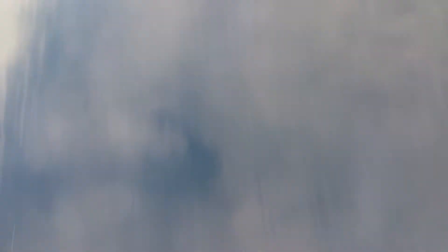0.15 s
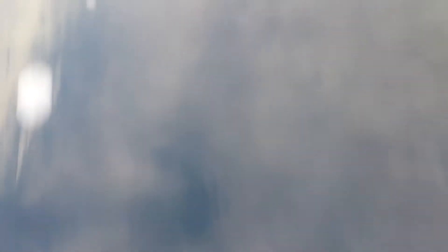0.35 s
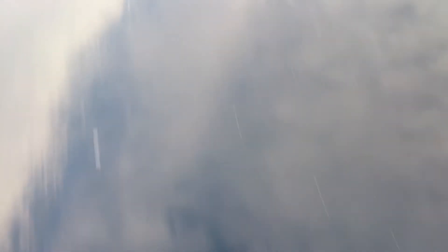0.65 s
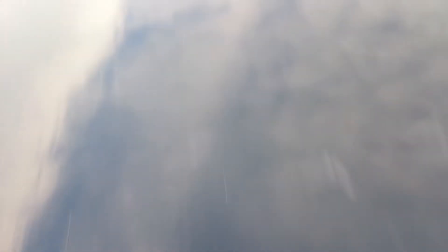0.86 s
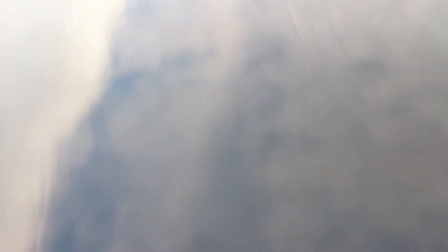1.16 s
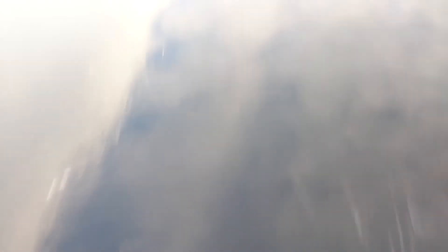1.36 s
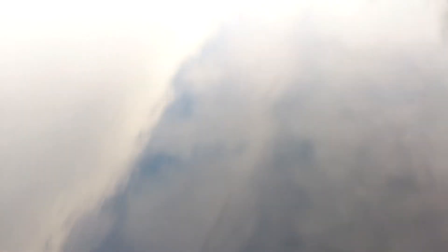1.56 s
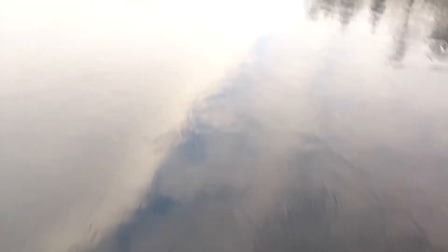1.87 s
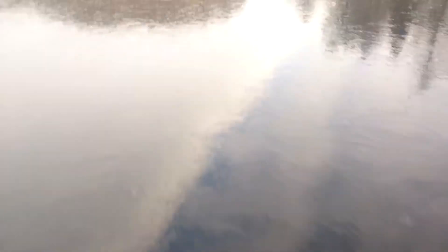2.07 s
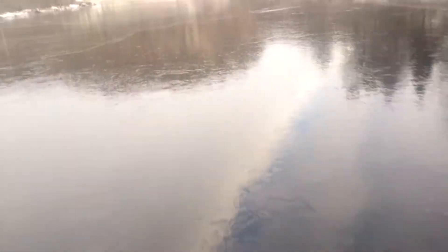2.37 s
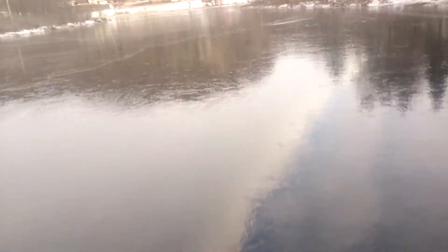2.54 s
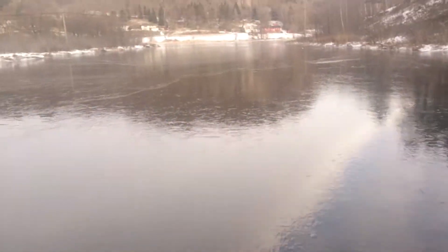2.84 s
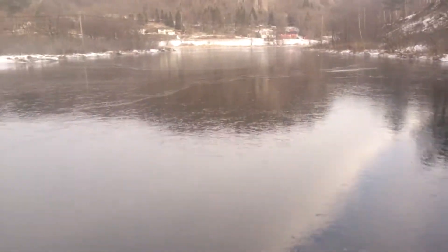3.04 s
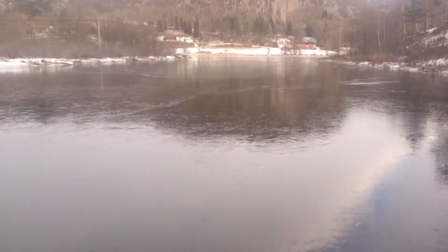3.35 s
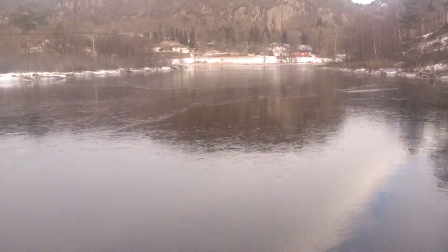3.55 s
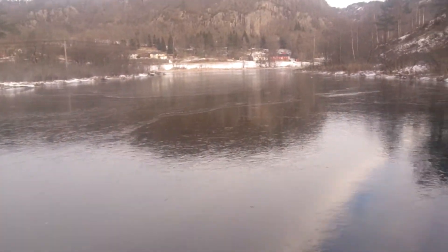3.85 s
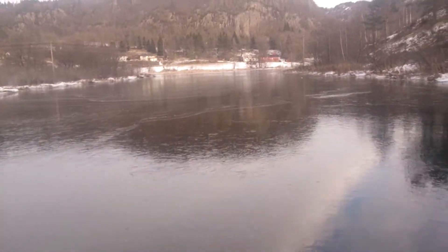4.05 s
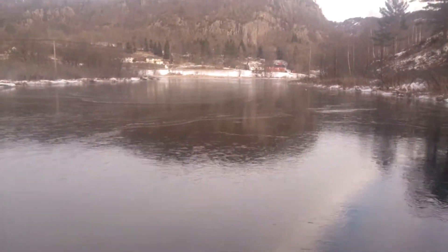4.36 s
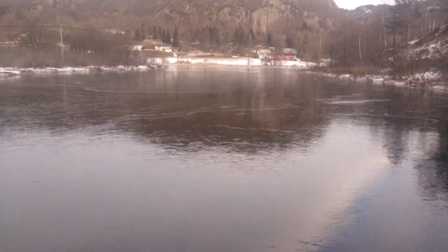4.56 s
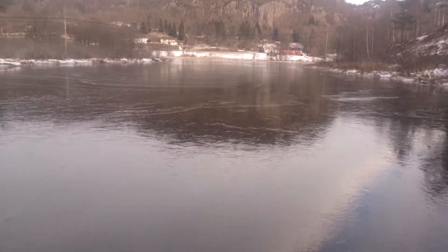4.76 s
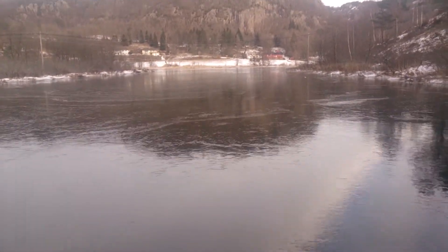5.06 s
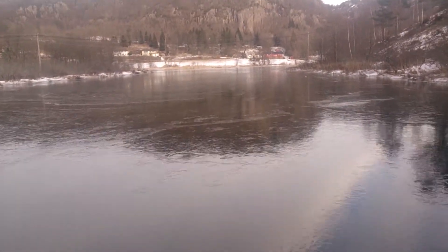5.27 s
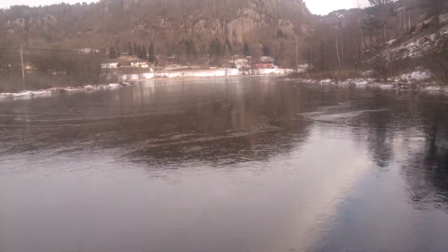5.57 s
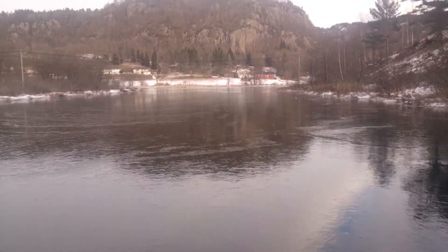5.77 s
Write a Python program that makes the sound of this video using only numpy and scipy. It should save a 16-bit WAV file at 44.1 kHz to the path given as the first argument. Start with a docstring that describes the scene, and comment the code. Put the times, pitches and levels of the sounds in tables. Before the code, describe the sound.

A skater's blades scrape river ice outdoors: short rough bites over a soft continuous hiss, with dry snaps, ticks and occasional bright skids of ice dust. The first second and a half is mostly ice detail; then gusts flutter and buffet the right side of the microphone while cracking continues to the end. A very faint low drone lies beneath. Direct stereo sound without reverberation.

```python
"""Skating on thin river ice

Blades crunch and hiss on the ice: noise grains coloured for a left and a right microphone port.
Cracks snap as short bursts of noise with a ring and a dull knock; brief skids add bright sprays.
Wind rumbles, flutters and thumps, far louder on the right, over a low drone with a faint hum.
The camera first looks down, then tilts ahead, and the colour of blades and cracks shifts with it.
"""
import sys
import numpy as np
from scipy import signal
from scipy.fft import rfft, irfft, next_fast_len
from scipy.io import wavfile
from scipy.ndimage import uniform_filter1d

SR = 44100
rng = np.random.default_rng(int(sys.argv[2]) if len(sys.argv) > 2 else 0)


def generate_wav(sig):
    """Save sig (samples, or channels by samples) to the path in sys.argv[1] as 16-bit PCM at SR."""
    pcm = np.round(np.clip(np.atleast_2d(sig).T, -1, 1) * 32767).astype(np.int16)
    wavfile.write(sys.argv[1], SR, pcm)


N = 260631

# How the wind's strength changes. Each row: time in seconds, rumble in dB before the wind's trims.
WIND_STRENGTH = [(0.0, -37), (0.55, -41), (0.8, -52), (1.17, -39.5), (1.33, -30.5), (1.47, -34.5),
                 (1.9, -30), (2.1, -23), (2.42, -25), (2.62, -29), (2.95, -21.5), (3.22, -29), (3.4, -19),
                 (3.62, -31), (4.1, -28.5), (4.75, -24.5), (5.0, -27), (5.91, -30.5)]
# Colour of the ice sounds at the right port.
# Each row: frequency in Hz, gain looking down in dB, gain looking ahead in dB.
RIGHT_COLOUR = [(94, -2, 4.5), (288, 1.5, -1.5), (900, -0.5, -3), (1120, -3, 2.5), (1690, 1, 5.5),
                (1965, 4.5, 13), (2335, -4, 0.5), (3234, -9, -1.5), (3930, -4, -19), (5220, -1, -6),
                (6620, -20.5, -22), (7790, -8.5, -12.5), (8900, -15, -13), (10730, -32, -32.5),
                (12700, -18, -34), (15400, -63, -40)]
# Colour of the ice sounds at the left port.
# Each row: frequency in Hz, gain looking down in dB, gain looking ahead in dB.
LEFT_COLOUR = [(97, -2.5, -11), (276, -0.5, -3), (1000, -6, -5.5), (1180, -12.5, -6), (1560, -18.5, -15),
               (2000, -10.5, -4.5), (2300, -13.5, -11), (3450, -12, -14.5), (5600, -19, -25.5),
               (6300, -25, -29), (9200, -18.5, -26), (11000, -29, -30.5), (13300, -24.5, -43),
               (15800, -41, -41)]
DOWN, AHEAD = 1, 2  # the gain columns of the two port tables


def amp(db):
    """Turns decibels into a plain factor."""
    return 10 ** (np.asarray(db) / 20)


def unit(x):
    """Scales to an rms of 1."""
    return x / np.sqrt(np.mean(x ** 2) + 1e-20)


def colour(table, hz, axis=1):
    """Gain at hz from one dB column of a spectrum table."""
    table = np.array(table, float)
    return amp(np.interp(np.log(hz + 1), np.log(table[:, 0] + 1), table[:, axis]))


def port_colours(hz, view):
    """Gains of the left and right port while the camera looks down or ahead."""
    return np.array([colour(port, hz, axis=view) for port in (LEFT_COLOUR, RIGHT_COLOUR)])


def curve(table):
    """Gain at every sample from the dB column of a time table."""
    table = np.array(table, float)
    return amp(np.interp(np.arange(N) / SR, table[:, 0], table[:, 1]))


def shaped(x, gain):
    """Filters x by a gain that is a function of frequency."""
    size = next_fast_len(N + 4096)
    return irfft(rfft(x, size) * gain(np.fft.rfftfreq(size, 1 / SR)), size)[..., :N]


def highpass(hz, corner_hz):
    """A steep gain that lets only the treble above the corner through."""
    return 1 - 1 / (1 + (hz / corner_hz) ** 12)


def wander(rate_hz):
    """Smooth random movement with an rms of 1, mostly slower than the given rate."""
    return unit(shaped(rng.standard_normal(N), lambda hz: 1 / (1 + (hz / rate_hz) ** 4)))


def patchy(x, depth_db):
    """Lets the colour shift from moment to moment, as the blade meets ever new ice."""
    z = signal.stft(x, nperseg=512, noverlap=384)[2]
    patches = rng.standard_normal(z.shape[:0:-1]).T
    # smooth the random gains over frequency, then over time
    patches = uniform_filter1d(patches, size=6, axis=0)
    patches = unit(uniform_filter1d(patches, size=9, axis=1))
    return signal.istft(z * amp(depth_db * patches), nperseg=512, noverlap=384)[1][:, :N]


def causal(gain):
    """Minimum-phase response: resonances ring after a click, never before."""
    log_gain = np.log(np.concatenate([gain, gain[-2:0:-1]]) + 1e-5)
    return np.exp(np.conj(signal.hilbert(log_gain)))[:len(gain)]


def tilt(s):
    """0 while the camera looks down, 1 once it looks ahead, with a steady swing between."""
    start_s, end_s = 0.79, 2.66
    return np.clip((s - start_s) / (end_s - start_s), 0, 1)


def bands(hz):
    """Shares of the knock, snap and splinter registers; they sum to 1."""
    low_hz, high_hz = 790, 3900
    low = 1 / (1 + (hz / low_hz) ** 10)
    high = 1 - 1 / (1 + (hz / high_hz) ** 10)
    return low, 1 - low - high, high


def port_pair(near, other, hz):
    """Left and right spectra: alike in the bass, out of step and less alike in the treble."""
    lag_rad, turn_hz, apart_hz = 1.82, 1400, 3800
    same = 1 / np.sqrt(1 + (hz / apart_hz) ** 2)
    turn = np.exp(1j * (lag_rad - 2 * np.pi) / (1 + (turn_hz / (hz + 1)) ** 7))
    left = turn * (same * near + np.sqrt(1 - same ** 2) * other)
    return np.array([left, near])


def add(mix, s, sound):
    """Adds a short sound to the mix from s seconds on, cut at the end of the mix."""
    part = mix[:, max(round(s * SR), 0):][:, :sound.shape[1]]
    part += sound[:, :part.shape[1]]


def sheet():
    """The ice sheet drones under the skater's weight: low filtered noise plus a narrow faint hum."""
    # Colour of the drone. Each row: frequency in Hz, gain in dB.
    drone_colour = [(20, -25), (110, -8), (230, 4.5), (420, -3.5), (560, -4), (660, -0.5), (850, -6.5),
                    (1400, -18), (4000, -28), (14000, -25)]
    drone_db, sway_db, sway_hz = -52, 0.37, 2.8
    hum_hz, hum_half_width_hz, hum_db = 320, 9, -56
    left_db = -5.5  # against the right port

    wide, narrow = rng.standard_normal((2, N))
    drone = unit(shaped(wide, lambda hz: colour(drone_colour, hz)))
    drone *= amp(drone_db + sway_db * wander(sway_hz))
    hum = unit(shaped(narrow, lambda hz: 1 / (1 + ((hz - hum_hz) / hum_half_width_hz) ** 2)))
    return (drone + hum * amp(hum_db)) * amp([[left_db], [0]])


def flutter_level():
    """Gain of the flutter: it follows the wind and swells in every gust, added as power."""
    # Gusts at the port. Each row: middle in seconds, half length in seconds,
    # level in dB before the wind's shaping.
    gust_rows = [(1.657, 0.056, -37.5), (1.865, 0.028, -32.5), (1.972, 0.018, -20.5), (2.065, 0.049, -26),
                 (2.356, 0.075, -28.5), (2.984, 0.062, -22), (3.412, 0.025, -25), (3.5, 0.036, -24.5),
                 (3.924, 0.039, -30), (4.178, 0.094, -29), (4.369, 0.038, -20), (4.476, 0.039, -23.5),
                 (4.572, 0.027, -20.5), (4.697, 0.031, -25.5), (4.801, 0.029, -21.5), (5.612, 0.1, -25.5),
                 (5.862, 0.096, -22)]
    between_gusts_db = -10.5  # against the wind strength curve
    t = np.arange(N) / SR
    gusts = sum((amp(db) * np.exp(-((t - s) / half) ** 2)) ** 2 for s, half, db in gust_rows)
    return np.sqrt((curve(WIND_STRENGTH) * amp(between_gusts_db)) ** 2 + gusts)


def wind():
    """Eddies hit mostly the right port: deep rumble, lumpy flutter in strong gusts, single thumps."""
    # Colour of the rumble. Each row: frequency in Hz, gain in dB.
    rumble_colour = [(8, -11), (25, 4.5), (50, -2), (100, -8), (160, -16.5), (300, -33.5), (600, -64),
                     (1500, -94)]
    # Colour of the flutter. Each row: frequency in Hz, gain in dB.
    flutter_colour = [(40, -25), (130, -0.5), (200, -4), (320, -9.5), (500, -17.5), (800, -26.5),
                      (1400, -41.5), (4000, -67)]
    # Single eddies striking the port. Each row: middle in seconds, level in dB before halving.
    buffet_rows = [(2.066, -17), (2.276, -23.5), (2.332, -35), (2.458, -19.5), (2.557, -25), (4.581, -15.5),
                   (4.694, -18.5), (5.796, -14)]
    rumble_db, gust_rumble_db, calm_db = 1.0, -5.0, -51
    lumps_db, lumps_hz = 3.5, 40
    swell_db, swell_hz = 1.78, 12
    buffet_s = 0.0062
    left_db = -32  # the left port is sheltered

    t = np.arange(N) / SR
    deep, fast, sudden = rng.standard_normal((3, 2, N))
    gust = flutter_level()
    rumble = unit(shaped(deep, lambda hz: colour(rumble_colour, hz)))
    rumble *= np.hypot(curve(WIND_STRENGTH) * amp(rumble_db), gust * amp(gust_rumble_db))
    # light air flows past with hardly any flutter
    gust = gust ** 3 / (gust ** 2 + amp(calm_db) ** 2)
    lumpy = fast * amp(lumps_db * wander(lumps_hz))
    flutter = unit(shaped(lumpy, lambda hz: colour(flutter_colour, hz)))
    out = rumble * amp(swell_db * wander(swell_hz)) + flutter * gust
    # a buffet is a brief puff with both the rumble and the flutter in it
    eddy = shaped(sudden, lambda hz: colour(flutter_colour, hz) + colour(rumble_colour, hz))
    for s, db in buffet_rows:
        near = abs(t - s) < 4 * buffet_s
        thump = eddy[:, near] * np.exp(-((t[near] - s) / buffet_s) ** 2)
        out[:, near] += amp(db) * unit(thump) / 2
    return out * amp([[left_db], [0]])


def skids():
    """An edge slips sideways and sprays ice dust: short swells of bright, grainy noise."""
    # Each row: middle in seconds, half length in seconds, level in dB, lift of the top treble in dB.
    skid_rows = [(0.813, 0.0083, -36.5, 16), (0.848, .02, -44.5, 23), (1.998, 0.042, -34, -14),
                 (4.264, 0.027, -36, -4), (5.582, 0.022, -32, 7), (5.726, 0.013, -27, 5)]
    corner_hz, top_hz = 3200, 9500
    patch_db, grit_db, grit_hz = 3.5, 1.5, 400

    t, out = np.arange(N) / SR, np.zeros((2, N))
    dust = patchy(rng.standard_normal((2, N)), patch_db)
    dust = dust * amp(grit_db * wander(grit_hz))
    dust = shaped(dust, lambda hz: port_colours(hz, AHEAD) * hz ** 2 / (hz ** 2 + corner_hz ** 2))
    top = shaped(dust, lambda hz: highpass(hz, top_hz))
    for s, half, db, lift_db in skid_rows:
        spray = dust + (amp(lift_db) - 1) * top
        out += amp(db) * spray / spray[1].std() * np.exp(-((t - s) / half) ** 2)
    return out


def edge_levels():
    """Gains of crunch and hiss: flat glide plus scrapes that dig in, hold and let go."""
    # The blades running flat, louder on rough ice.
    # Each row: time in seconds, level in dB before the blades' trims.
    glide_rows = [(0.0, -47.5), (0.85, -49.5), (1.04, -56), (1.3, -49), (1.53, -47.5), (1.62, -59),
                  (1.92, -60.5), (2.1, -47), (2.47, -53), (3.3, -49), (3.9, -51), (4.8, -50), (5.4, -54),
                  (5.55, -46), (5.91, -49.5)]
    # An edge bites and scrapes. Each row: start in seconds, length in seconds,
    # crunch in dB and hiss in dB, both before the blades' trims.
    scrape_rows = [(0.044, 0.09, -40.5, -43.5), (0.314, 0.23, -53.5, -47.5), (0.629, 0.12, -42.5, -42),
                   (0.805, 0.037, -45, -44), (1.113, 0.043, -43, -45), (1.159, 0.12, -37, -53),
                   (1.476, 0.11, -62, -45), (1.959, 0.084, -41.5, -38.5), (2.077, 0.064, -42, -40),
                   (2.191, 0.12, -46, -41.5), (2.63, 0.061, -42, -50), (2.737, 0.059, -42, -42),
                   (2.8, 0.029, -38.5, -33), (3.134, 0.063, -45, -59), (3.302, 0.074, -37.5, -38.5),
                   (3.991, 0.054, -34.5, -54), (4.035, 0.078, -44.5, -47), (4.348, 0.074, -46, -51),
                   (4.59, 0.062, -48, -46), (4.691, 0.2, -38.5, -48.5), (4.968, 0.073, -46.5, -46),
                   (5.71, 0.06, -44, -44)]
    hiss_down_db, hiss_ahead_db = 0.5, -2  # glide hiss against its crunch, before the trims
    bite_s, release_s = 0.009, 0.014

    t = np.arange(N) / SR
    glide = curve(glide_rows)
    glide_hiss = glide * amp(hiss_down_db + (hiss_ahead_db - hiss_down_db) * tilt(t))
    power = np.array([glide, glide_hiss]) ** 2
    for s, length, crunch_db, hiss_db in scrape_rows:
        attack = np.clip((t - s) / bite_s, 0, 1)
        release = np.exp(-np.clip((t - s - length) / release_s, 0, 20))
        power += (amp([[crunch_db], [hiss_db]]) * attack * release) ** 2
    return np.sqrt(power)


def blades(crunch, hiss):
    """Steel shaves the ice: a fine hiss and a spray of small chips swell as the edge bites."""
    crunch_db, crunch_flicker_db = -2.0, 4.5
    hiss_db, hiss_flicker_db = -3.5, 3.5
    flicker_hz, patch_db, left_db = 70, 2.0, 2.0
    chips_per_s, chip_db, chip_s = 700, 4.0, 0.003
    steady_share = 0.65  # amount of even noise between the chips
    low_share = 0.47  # amount of the low register in the crunch
    dust_hz, dust_db = 10500, -52

    chip_size = amp(chip_db * np.minimum(rng.exponential(1, N), 4))
    chips = (rng.random(N) < chips_per_s / SR) * chip_size
    # the power of each chip dies away in a few milliseconds
    chips = signal.lfilter([1], [1, -np.exp(-1 / (chip_s * SR))], chips ** 2)
    grainy = rng.standard_normal((2, N)) * np.sqrt(steady_share ** 2 + chips / chips.mean())
    drive = patchy(grainy, patch_db)

    size = next_fast_len(N)
    hz = np.fft.rfftfreq(size, 1 / SR)
    pair = port_pair(*rfft(drive, size), hz)
    low, mid, high = bands(hz)
    bite = wander(flicker_hz)
    crunch = crunch * amp(crunch_db + crunch_flicker_db * bite)
    hiss = hiss * amp(hiss_db + hiss_flicker_db * bite)
    up = tilt(np.arange(N) / SR)
    out = np.zeros((2, N))
    # crossfade from looking down to looking ahead
    for view, share in ((DOWN, 1 - up), (AHEAD, up)):
        heard = pair * port_colours(hz, view)
        for band, level in ((mid + low_share * low, crunch), (high, hiss)):
            part = irfft(band * heard, size)[:, :N]
            out += share * level * part / part[1].std()
    # the finest dust, in the top treble, fades when the hiss is weak and lifts when it is strong
    dust = shaped(out, lambda hz: highpass(hz, dust_hz))
    out += dust * (np.sqrt(2 * hiss / (hiss + amp(dust_db))) - 1)
    return out * amp([[left_db], [0]])


def ticks(crunch):
    """Rows for faint cracks at random moments, stronger where the edge bites harder."""
    # limits of the random draws: level over the crunch in dB, knock and splinter against
    # that level in dB, length in seconds, ring in Hz
    lowest, highest = (1.5, -18, -8, 0.003, 1000), (8.5, -6, 2, 0.008, 7000)
    per_s = 16
    draws = rng.random((200, 6))
    times = np.cumsum(0.5 + draws[:, 0]) / per_s
    drawn = np.array(lowest) + draws[:, 1:] * np.subtract(highest, lowest)
    rows = []
    for s, (over_db, *rest) in zip(times, drawn):
        if s < N / SR:
            rows.append((s, 20 * np.log10(crunch[int(s * SR)]) + over_db, *rest))
    return rows


def chatter():
    """Rows for a blade chattering: an even run of soft scuffs, each a little softer than the last."""
    # The first scuff. Its values: level in dB, knock against it in dB, splinter treble against it
    # in dB, length in seconds, ring in Hz.
    first_scuff = (-39, -20, -0.5, 0.008, 5500)
    count, start_s, gap_s, fade_db = 4, 5.105, 0.0535, -0.7
    db, *rest = first_scuff
    return [(start_s + k * gap_s, db + k * fade_db, *rest) for k in range(count)]


def cracks(rows):
    """Each crack is a quick run of tiny fractures plus one push that bends the sheet."""
    spread = 0.47  # time to the peak of the run, as a share of the crack's length
    edge_bite_s, bite_db = 0.003, -20  # the edge presses in before the ice gives
    tail_s, tail_db = 0.01, -25
    flex, flex_s = 1.0, 0.00023  # strength of the push, and its delay after the peak
    grit_db, uneven_db = 2.5, 2.5
    ring_db, ring_width = 7.5, 0.14  # the width is a share of the ring's pitch
    size = 4096

    early = (size // 5) / SR  # room for the sound ahead of the crack
    t, hz = np.arange(size) / SR - early, np.fft.rfftfreq(size, 1 / SR)
    down, ahead = port_colours(hz, DOWN), port_colours(hz, AHEAD)
    low, mid, high = bands(hz)
    reference = SR / 100  # levels are rms over 10 ms
    out = np.zeros((2, N))
    for s, db, knock_db, splinter_db, length, ring_hz in rows:
        u = np.maximum(t, 0) / max(spread * length, 1e-4)
        # the edge bites, the ice gives, crumbs follow
        run = amp(bite_db) * np.exp(-abs(t) / edge_bite_s)
        run += np.e * u * np.exp(-u)
        run += amp(tail_db) * np.exp(-abs(t) / tail_s) * (1 - np.exp(-u))
        grains = rng.standard_normal((4, size))
        near, other = rfft(grains[:2] * run * amp(grit_db * grains[2]))
        # bending waves are slow, so the knock trails the snap
        delay = early + flex_s + spread * length
        push = flex * np.sqrt(np.mean(abs(near) ** 2)) * np.exp(-2j * np.pi * hz * delay)
        # every piece has one main resonance and an uneven colour of its own
        uneven = uniform_filter1d(grains[3, :len(hz)], size=50)
        uneven = unit(uniform_filter1d(uneven, size=30))
        ring = ring_db / (1 + ((hz / ring_hz - 1) / ring_width) ** 2)
        piece = amp(ring + uneven_db * uneven)
        view = down ** (1 - tilt(s)) * ahead ** tilt(s)
        ports = np.array([causal(gain * piece) for gain in view])
        # the knock is levelled at the left port (0), snap and splinter at the right (1)
        layers = ((low, near + push, knock_db, 0), (mid, near, 0, 1), (high, near, splinter_db, 1))
        for band, drive, level_db, port in layers:
            part = irfft(band * ports * port_pair(drive, other, hz))
            part *= np.sqrt(reference / np.sum(part[port] ** 2))
            add(out, s - early, amp(db + level_db) * part)
    return out


def scene():
    """Open ice gives no room: only direct sound, all layers added up."""
    # The cracks that stand out. Each row: time in seconds, snap level in dB, knock of the sheet
    # against the snap in dB, splinter treble against the snap in dB, length in seconds,
    # ring of the broken piece in Hz.
    clear_cracks = [(0.074, -33, -9.5, -14, 0.0025, 2110), (0.129, -39, -20, -7, 0.0038, 4140),
                    (0.16, -32.5, -22, -7, 0.0049, 3680), (0.2118, -22.5, -10.5, -12.5, 0.005, 1210),
                    (0.259, -31.5, -14, -13, 0.0048, 1350), (0.2924, -36, -3, -10, 0.0036, 890),
                    (0.355, -27.5, -7.5, -9, 0.0044, 850), (0.454, -32.5, -11, -19, 0.004, 1150),
                    (0.509, -25, -11.5, -9, 0.0072, 5000), (0.71, -31.5, -28, -23, 0.0068, 2810),
                    (0.816, -30.5, -13, -2, 0.008, 4650), (0.8733, -36, -11, -1, 0.0057, 5300),
                    (0.9095, -32, -10, -3.5, 0.004, 3280), (0.951, -39.5, -7, 2, 0.0044, 5640),
                    (0.9885, -22.5, -10.5, -7, 0.0033, 6800), (1.0542, -24.5, -10.5, -8, 0.0026, 1800),
                    (1.187, -32, -4.5, -13, 0.004, 2000), (1.1945, -28, -20, -4.5, 0.0047, 3660),
                    (1.221, -30.5, -32, -19, 0.006, 2110), (1.2617, -32.5, -27, -18, 0.0021, 2100),
                    (1.2935, -23, -22, -9.5, 0.004, 1680), (1.3474, -30, -17, -14, 0.0042, 1290),
                    (1.377, -33.5, -8.5, -16, 0.0036, 1540), (1.84, -40.5, -7, -1, 0.0032, 8730),
                    (1.8814, -32.5, -14, -7.5, 0.01, 1300), (1.947, -17.5, -46, -10, 0.0017, 1160),
                    (1.9712, -22, -35, -9, 0.0076, 1060), (1.985, -24, -34, -11, 0.011, 1040),
                    (2.1036, -22.5, -22, -11.5, 0.00087, 1690), (2.1985, -23.5, -17, -17, 0.0041, 1300),
                    (2.244, -32.5, -29, 1, 0.0088, 4240), (2.3446, -32, -29, 4, 0.0081, 6300),
                    (2.412, -30.5, -12, -5, 0.0029, 4400), (2.4927, -37, -16, -1.5, 0.0009, 4550),
                    (2.583, -18, -28, -6.5, 0.0067, 6050), (2.6217, -22, -40, -9.5, 0.0039, 2540),
                    (2.6416, -22.5, -44, -12, 0.0025, 2740), (2.65, -23, -29, -29, 0.0045, 2680),
                    (2.6765, -21.5, -7.5, -10, 0.0032, 2760), (2.783, -25, -10, -33, 0.0014, 1880),
                    (2.8403, -24, -11, -13, 0.0041, 3700), (2.8982, -25, -18, -11, 0.005, 2100),
                    (2.9705, -36, -5, -2, 0.0061, 850), (3.016, -28, -13, -13.5, 0.0029, 845),
                    (3.089, -17.5, -9.5, -14, 0.0042, 810), (3.1032, -25, -24, -10, 0.0028, 3450),
                    (3.2653, -19, -44, -16, 0.0023, 990), (3.292, -27.5, -35, -20, 0.0022, 2390),
                    (3.306, -26.5, -36, -20, 0.0036, 930), (3.347, -28, -35, -14, 0.0055, 960),
                    (3.4445, -22.5, -15, -15, 0.0039, 1230), (3.4577, -29.5, -15, -8.5, 0.0048, 3750),
                    (3.5366, -34, -11, -1.5, 0.0053, 9600), (3.622, -37, -9, 0, 0.0093, 9200),
                    (3.7223, -33.5, -11, -6.5, 0.0057, 4420), (3.81, -30.5, -16, 2.5, 0.0089, 9900),
                    (3.9492, -27, -18, -10.5, 0.0042, 1280), (4.0266, -15, -50, -8, 0.0049, 3100),
                    (4.1, -28, -18, -18, 0.0055, 2090), (4.2712, -23, -16, -6.5, 0.008, 9700),
                    (4.3557, -27, -7, -12, 0.0028, 1980), (4.4116, -17.5, -27, -18, 0.0021, 1980),
                    (4.4781, -30, -5, -10, 0.0051, 900), (4.5892, -26.5, -9, -9.5, 0.0046, 2910),
                    (4.701, -34, -17, -9.5, 0.0054, 930), (4.8035, -37, -26, -13, 0.0061, 875),
                    (4.8185, -31, -17, -16, 0.0033, 980), (4.8315, -30.5, -13, -16, 0.0026, 1090),
                    (4.8404, -28.5, -18, -13.5, 0.0032, 2860), (4.9365, -32.5, -13, -6, 0.012, 7800),
                    (5.0551, -24, -9, -8, 0.0018, 1056), (5.442, -27.5, -40, -6, 0.0069, 6940),
                    (5.4818, -32.5, -5, -6.5, 0.0072, 910), (5.6467, -20, -21, -15.5, 0.0016, 2500),
                    (5.7302, -16.5, -12, -15, 0.0032, 2800), (5.7746, -30, -18, -28, 0.0014, 2070),
                    (5.832, -31, -30, -16, 0.003, 2050), (5.8658, -30, -21, -13.5, 0.0029, 2900)]
    crunch, hiss = edge_levels()
    background = sheet() + wind()
    skating = skids() + blades(crunch, hiss)
    return background + skating + cracks([*clear_cracks, *chatter(), *ticks(crunch)])


def record(dry):
    """The camera's band limit: a steep low-pass filter takes away the highest treble."""
    edge_hz = 15800
    lowpass = signal.firwin(301, edge_hz, window=("kaiser", 9), fs=SR)
    return signal.oaconvolve(dry, lowpass[None], "same")


dry = scene()
out = record(dry)
generate_wav(out)
```